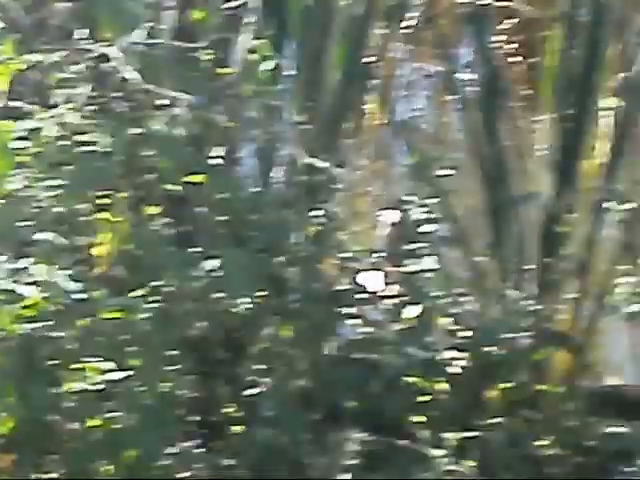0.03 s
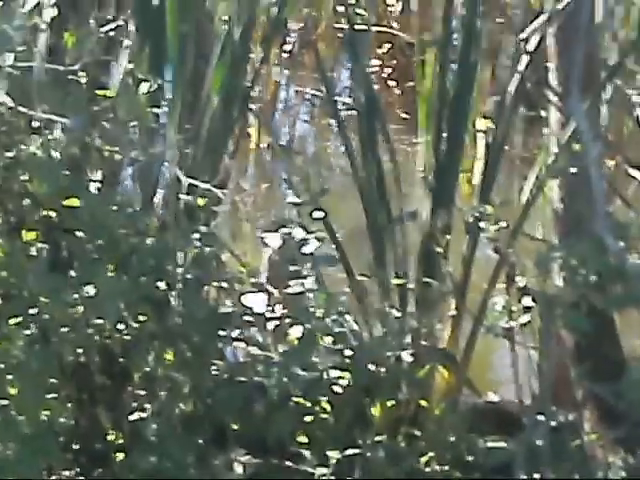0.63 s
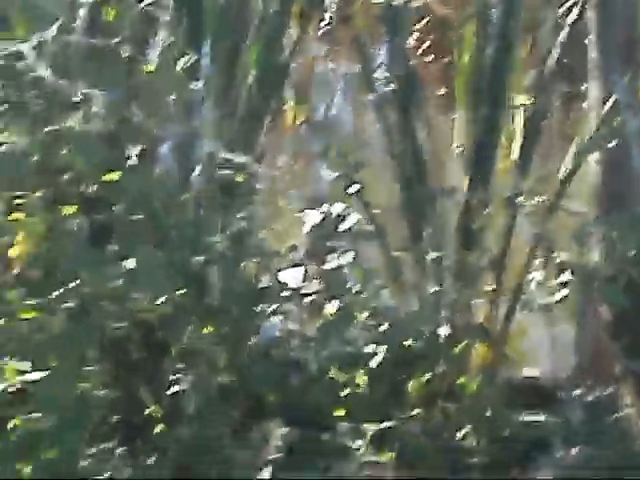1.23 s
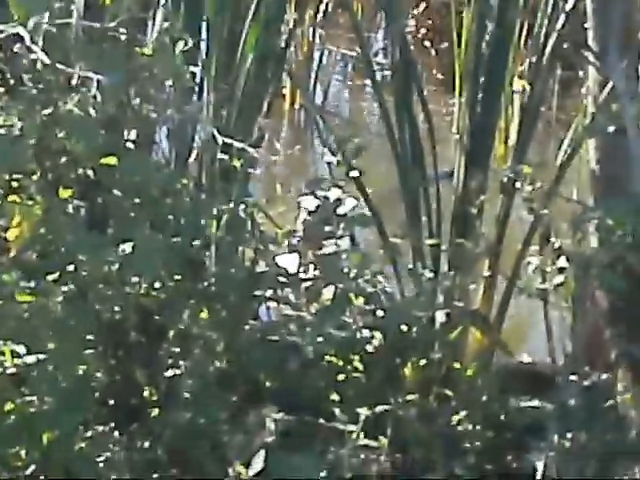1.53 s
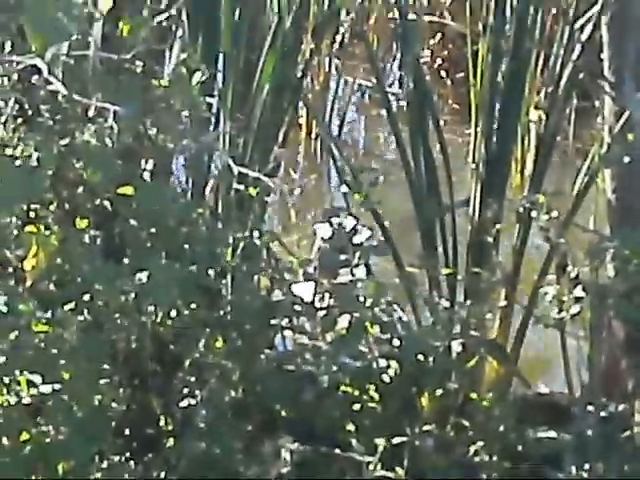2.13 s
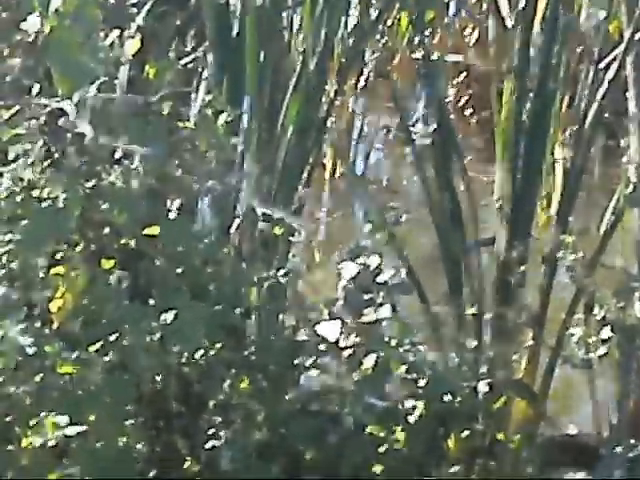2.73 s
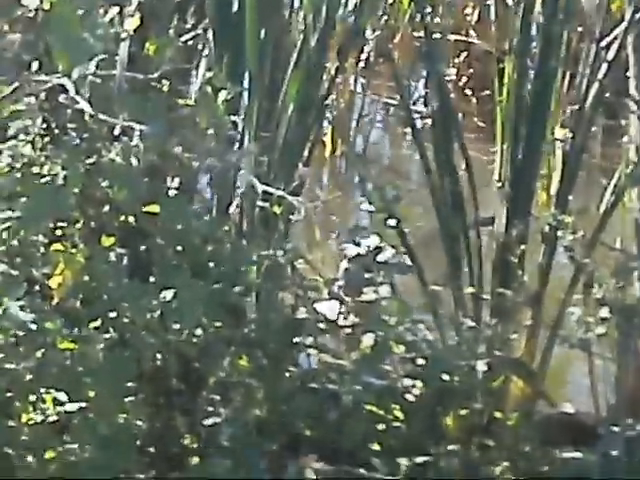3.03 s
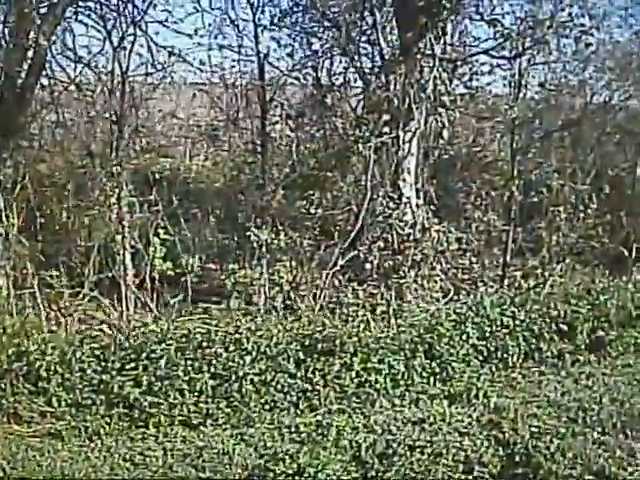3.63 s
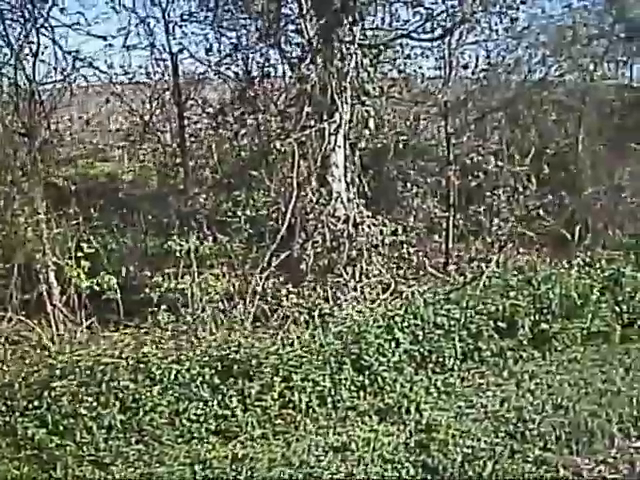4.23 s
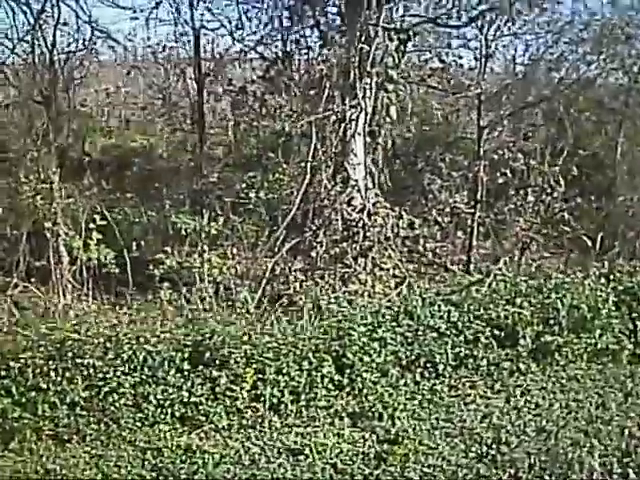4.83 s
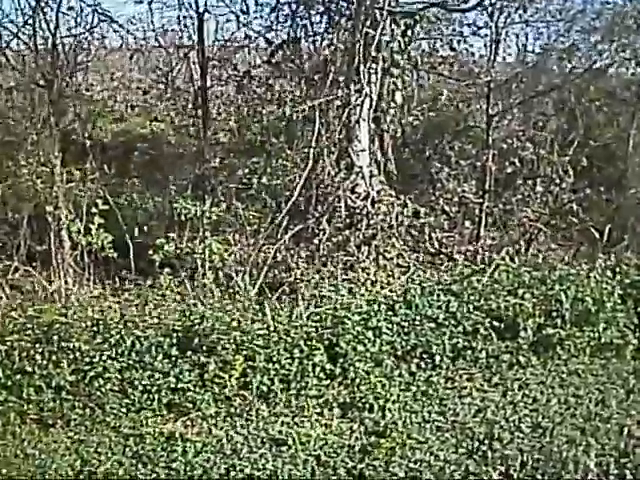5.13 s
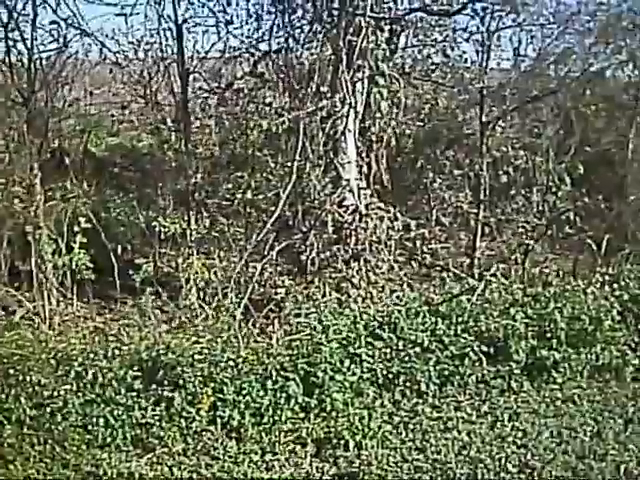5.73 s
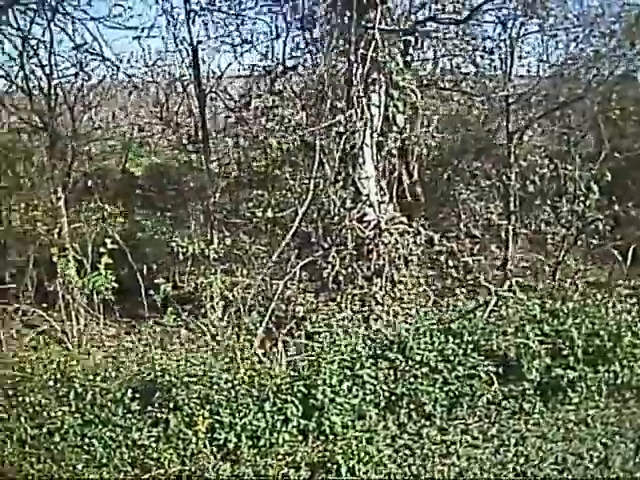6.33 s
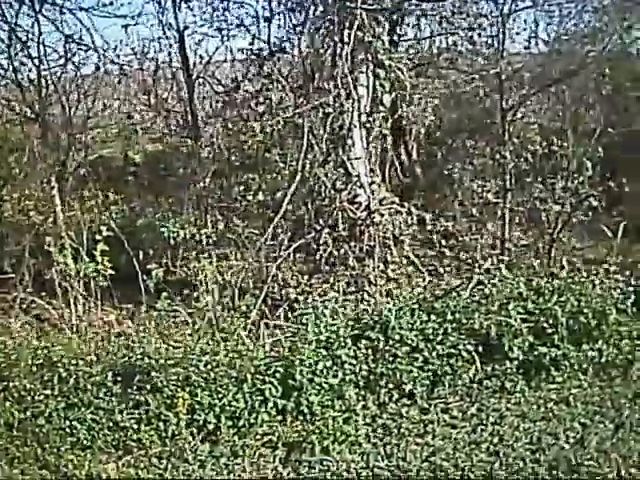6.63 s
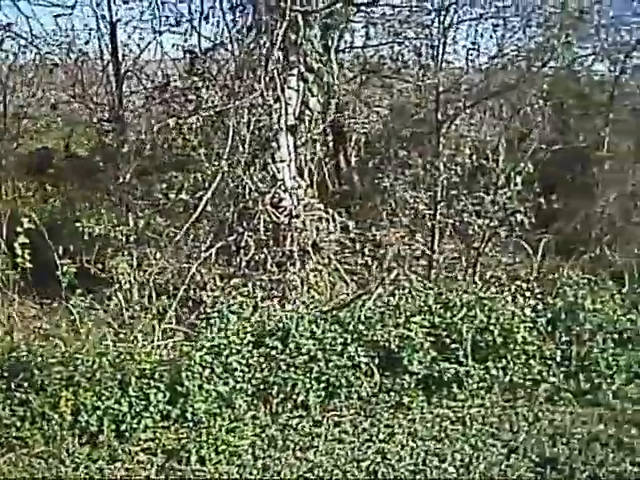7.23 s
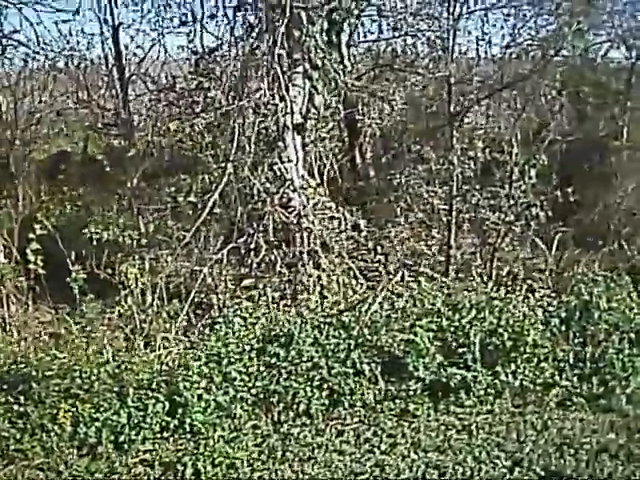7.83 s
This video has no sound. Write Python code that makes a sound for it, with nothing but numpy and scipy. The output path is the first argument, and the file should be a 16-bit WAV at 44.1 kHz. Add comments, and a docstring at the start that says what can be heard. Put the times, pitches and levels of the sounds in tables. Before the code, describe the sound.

Close, irregular rustling of plants with a hollow handling knock, small twig snaps and distant birds over a soft outdoor hush.

```python
"""Leaves and stems rustle, crunch and snap right at the microphone, swept aside beside a reedy pond.
A hand bumps the camera and rings its hollow case; thin squeaks, a stem's creak and soft steps are close.
Geese yelp far off, a nearer bird gives two harsh chacks, and a soft outdoor hush lies under everything.
The camera's one microphone feeds a coarse eight-bit converter that adds grit and passes little
above 5 kHz."""
import sys
import numpy as np
from scipy import signal
from scipy.fft import rfft, irfft
from scipy.io import wavfile

SR = 44100
rng = np.random.default_rng(int(sys.argv[2]) if len(sys.argv) > 2 else 0)


def output_pcm(signal):
    """Save a mono or channel-first signal as 16-bit PCM at the path in sys.argv[1].

    Samples are clipped to [-1, 1] before scaling.
    """
    pcm = np.clip(np.atleast_2d(signal).T, -1, 1) * 32767
    wavfile.write(sys.argv[1], SR, np.round(pcm).astype(np.int16))


N = 348390
TIME = np.arange(N) / SR

# Open air over the pond. Each row: time in seconds, distant hush in dB, leaf hiss in dB.
AIR_LEVELS = [(0, -54.5, -60), (1.3, -56.5, -60), (1.9, -54.5, -56.5), (2.5, -56, -58.5),
              (3.05, -52, -58.5), (3.35, -59.5, -61), (3.6, -57.5, -57.5), (4.3, -55, -57),
              (6.7, -56.5, -58.5), (7.45, -58, -55), (7.7, -57.5, -66), (7.9, -57, -58)]
# Spectra of the hush, the leaf hiss and the rumble. Each row: frequency in Hz, relative density in dB.
HUSH_SPECTRUM = [(200, -7.5), (260, -7), (350, 0), (500, -1), (750, 0), (1000, -0.5), (1300, -4.5),
                 (1750, -8), (2400, -10)]
HISS_SPECTRUM = [(1700, -4.5), (2300, -2.5), (3150, 2), (3600, -1), (4100, -5), (5200, -4)]
RUMBLE_SPECTRUM = [(25, -9), (40, -2), (60, -1), (85, -1), (120, -1), (165, -4), (230, -10.5), (300, -15)]
# Thin squeaks. Each row: time in seconds, pitch in Hz, level in dB.
THIN_SQUEAKS = [(0.014, 3116, -47), (0.222, 3230, -43), (0.37, 3400, -48), (0.452, 2950, -41)]
# Sweeps through the plants at the microphone. Each row: start, attack, hold and time to fall 20 dB,
# all in seconds, then crisp leaf level in dB, duller stem level in dB.
FOLIAGE_SWEEPS = [(0.15, 0.11, 0.091, 0.22, -50.5, -52), (0.378, .045, .09, 0.01, -38, -42.5),
                  (0.532, 0.026, 0.081, 0.08, -57, -52.5), (2.888, 0.034, 0.014, 0.35, -57, -49.5),
                  (3.57, .04, 0.13, 0.22, -47.5, -48.5), (4.387, 0.068, .14, .2, -47, -53),
                  (5.097, 0.083, .12, .33, -41.5, -47), (6.131, 0.051, .13, 0.44, -44, -51),
                  (6.895, .065, 0.18, .24, -37, -42.5)]
# Spectra of crackling leaves and stems. Each row: frequency in Hz, relative density in dB.
LEAF_SPECTRUM = [(1700, -8.5), (2400, -6), (2950, 2), (3280, 1.5), (3750, -2), (4200, -2.5), (4750, -0.5),
                 (5300, -0.5)]
STEM_SPECTRUM = [(130, -35.5), (220, -8.5), (238, -7.5), (352, -13.5), (426, -5.5), (470, -7.5), (723, -4),
                 (874, -3), (1050, -1), (1810, -7.5), (2400, -8), (3120, -26), (5280, -120)]
# Dry leaves crushed close by. Each row: time in seconds, level in dB, half-length in seconds.
LEAF_CRUNCHES = [(0.228, -47, .012), (0.283, -42.5, .008), (0.428, -38.5, .008), (0.505, -32, .012),
                 (2.097, -48.5, 0.0079), (3.599, -43.5, .01), (3.724, -38.5, 0.0045), (4.081, -52, 0.017),
                 (4.426, -38, .009), (4.519, -38.5, 0.0075), (4.614, -45.5, .008), (4.967, -41, .011),
                 (5.188, -38, .012), (5.312, -40.5, .006), (5.341, -41.5, .007), (6.194, -42.5, .014),
                 (6.478, -45.5, .022), (7.056, -30.5, .018)]
# Geese far off. Each row: time in seconds, top pitch in Hz, level in dB,
# gain of the harmonics above the second in dB.
GOOSE_YELPS = [(0.181, 591.5, -49.5, -4.5), (0.335, 433, -47, -7.5), (0.81, 624, -50.5, 0.5),
               (1.055, 560, -46, -10), (1.266, 540, -52.5, -4.5), (1.362, 621.8, -54, 0.5),
               (1.469, 436.4, -50.5, -17), (1.618, 561.4, -50.5, -8), (1.711, 482.7, -47, -10),
               (1.849, 561, -48, -6), (1.971, 535, -49, -8), (2.09, 560, -51.5, -4.5),
               (2.136, 645.6, -46, -12.5), (2.345, 603, -53.5, -18), (7.757, 471, -60.5, 4.5)]
# A goose's voice. Each row: harmonic number, relative level in dB.
GOOSE_HARMONICS = [(2, -1), (3, -3), (4, 1.5), (5, -21)]
# A hand meeting the camera. Each row: time in seconds, strength in dB.
HAND_BUMPS = [(0.4876, -24), (0.4936, -19.3), (0.5048, -8.4), (0.50705, -16.5), (0.51048, -13),
              (0.51504, -15.6), (0.51785, -10.3)]
# Modes of the case around the microphone. Each row: frequency in Hz, gain in dB, 60 dB decay in seconds.
CASE_MODES = [(328, -11, .05), (430, -16.2, .039), (582, -8.5, .045), (754, -13.1, .034), (846, -1.5, .033),
              (944, -9.8, .02), (1254, -9, .027), (1398, -23.8, .038), (1856, -18.6, .025),
              (3550, -24.5, .011)]
# Twigs breaking close by. Each row: time in seconds, strength in dB, pitch in Hz, 60 dB decay in seconds.
TWIG_SNAPS = [(2.4944, -29, 3510, 0.0045), (2.4963, -29, 2070, .005), (3.608, -26, 1980, 0.0043),
              (3.7778, -28, 706, 0.011), (5.302, -21.5, 3020, .0088), (6.138, -29.5, 2024, .011),
              (6.2453, -22.5, 1290, .003)]
# Quick slips of a dry stem. Each row: time in seconds, level in dB.
STEM_SLIPS = [(3.182, -30.5), (3.1868, -24), (3.1943, -31.5), (3.202, -35)]
# The nearer bird. Each row: time in seconds, mid-call pitch in Hz, level in dB, half-length in seconds.
BIRD_CHACKS = [(5.6465, 488, -28.7, 0.011), (6.041, 447, -37, .012)]
# That bird's voice. Each row: harmonic number, relative level in dB.
CHACK_HARMONICS = [(2, -19), (3, -7), (4, -17.5), (5, -6.5), (6, -1.5), (7, -8.5), (8, -8), (10, -4.5)]
# Steps on soft ground. Each row: time in seconds, level in dB, half-length in seconds.
FOOTFALLS = [(6.192, -43, 0.013), (6.54, -35.5, 0.005), (7.035, -47, 0.051), (7.319, -45, 0.014)]
# The smoothing filter after the converter. Each row: frequency in Hz, gain in dB.
SMOOTHING_RESPONSE = [(0, -0.5), (2400, 0), (3300, 1), (4000, -4.5), (4550, -7.5), (5000, -14), (5450, -20),
                      (5800, -39.5), (6250, -52), (6500, -71)]
# Very faint, steady high tones. Each row: frequency in Hz, level in dB.
HIGH_TONES = [(8269, -99), (9647, -101), (11025, -90)]


def from_db(db):
    """Decibels to gain."""
    return 10 ** (np.asarray(db) / 20)


def unit_rms(x):
    """Scale to unit power."""
    return x / np.sqrt(np.mean(x ** 2) + 1e-20)


def swell(s, half_length):
    """A bell-shaped rise and fall around time s."""
    return np.exp(-.5 * np.minimum(((TIME - s) / half_length) ** 2, 100))


def stroke(start, attack, hold, release):
    """A push builds up, holds, then the plants settle by 20 dB per release time."""
    rise = np.clip((TIME - start) / attack, 0, 1)
    settling = np.maximum(TIME - start - attack - hold, 0)
    return rise * from_db(-20 * np.minimum(settling / release, 10))


def drift(rate):
    """A smooth random wander with spread 1, changing about rate times a second."""
    hz = np.arange(N // 2 + 1) * SR / N
    return unit_rms(irfft(rfft(rng.standard_normal(N)) / (1 + (hz / rate) ** 4), N))


def colour(x, spectrum):
    """Give x a spectrum that falls away beyond its ends, at unit power."""
    hz = np.maximum(np.arange(N // 2 + 1) * SR / N, 1)
    points, db = np.transpose(spectrum)
    skirts = np.minimum(1, np.minimum(hz / points[0], points[-1] / hz)) ** 4
    gain = from_db(np.interp(np.log(hz), np.log(points), db))
    return unit_rms(irfft(rfft(x) * skirts * gain, N))


def noise(spectrum):
    """Steady noise, coloured by points of frequency in Hz and relative density in dB."""
    return colour(rng.standard_normal(N), spectrum)


def filtered(x, order, hz, kind):
    """A low, high or band pass with a flat passband."""
    return signal.sosfilt(signal.butter(order, hz, kind, fs=SR, output="sos"), x + 1e-18)


def ring(clicks, hz, t60):
    """A unit click rings a sine of height 1 that falls 60 dB in t60 seconds."""
    radius, angle = from_db(-60 / (t60 * SR)), 2 * np.pi * hz / SR
    return signal.lfilter([0, np.sin(angle)], [1, -2 * radius * np.cos(angle), radius ** 2], clicks + 1e-18)


def click(s, db):
    """One sharp contact."""
    return from_db(db) * (np.arange(N) == round(s * SR))


def grains(per_s, spread_db):
    """Countless tiny fractures: most are faint, a few stand out."""
    sizes = from_db(spread_db * np.minimum(rng.exponential(1, N), 5))
    return sizes * rng.choice([-1, 1], N) * (rng.random(N) < per_s / SR)


def air(flutter_db=1.95, rumble_db=-56, sway_db=.76):
    """The bed of the place: distant hush and faint leaf hiss flutter over a slowly swaying rumble."""
    times, hush_db, hiss_db = np.transpose(AIR_LEVELS)
    sway = sway_db * drift(2.2)
    flutter = flutter_db * drift(40)
    hush = from_db(np.interp(TIME, times, hush_db) + flutter) * noise(HUSH_SPECTRUM)
    hiss = from_db(np.interp(TIME, times, hiss_db) + flutter) * noise(HISS_SPECTRUM)
    rumble = from_db(rumble_db + sway) * noise(RUMBLE_SPECTRUM)
    return hush + hiss + rumble


def squeaks(overtone=1.52, overtone_db=-4, waver=.012, sag_hz_per_s=1500, half_length_s=.014):
    """Brief, thin high notes that waver and sag in pitch, each with one overtone."""
    out, unsteady = np.zeros(N), 1 + waver * drift(200)
    for s, hz, db in THIN_SQUEAKS:
        pitch = (hz - sag_hz_per_s * (TIME - s)) * unsteady
        phase = 2 * np.pi * np.cumsum(pitch) / SR
        note = np.sin(phase) + from_db(overtone_db) * np.sin(overtone * phase)
        out += from_db(db) * swell(s, half_length_s) * note
    return out


def foliage(clump_db=1.27, catch_db=1.0, crunch_stem_db=-8.5):
    """At the microphone, swept or crushed leaves and stems crackle in clumps, catching and letting go."""
    leaf_power, stem_power = np.zeros(N), np.zeros(N)
    for start, attack, hold, release, leaf_db, stem_db in FOLIAGE_SWEEPS:
        push = stroke(start, attack, hold, release)
        leaf_power += (push * from_db(leaf_db)) ** 2
        stem_power += (push * from_db(stem_db)) ** 2
    for s, db, half_length in LEAF_CRUNCHES:
        crush = from_db(db) * swell(s, half_length)
        leaf_power += crush ** 2
        stem_power += (crush * from_db(crunch_stem_db)) ** 2
    leaves = np.sqrt(leaf_power) * colour(grains(per_s=9000, spread_db=4.2), LEAF_SPECTRUM)
    stems = np.sqrt(stem_power) * colour(grains(per_s=6000, spread_db=.5), STEM_SPECTRUM)
    return (leaves + stems) * from_db(clump_db * drift(87) + catch_db * drift(18))


def geese(arch=.026, waver=.026, half_length_s=.018):
    """Far off, short yelps arch up and down in pitch; the second harmonic carries farthest."""
    out, unsteady = np.zeros(N), 1 + waver * drift(120)
    for s, hz, db, upper_db in GOOSE_YELPS:
        calling = np.abs(TIME - s) < 4 * half_length_s
        along = (TIME[calling] - s) / half_length_s
        pitch = hz * unsteady[calling] * np.exp(-arch * along ** 2)
        phase = 2 * np.pi * np.cumsum(pitch) / SR
        voice = sum(from_db(level + upper_db * (k > 2)) * np.sin(k * phase)
                    for k, level in GOOSE_HARMONICS)
        out[calling] += from_db(db) * np.exp(-.5 * along ** 2) * voice
    return out


def handling(softness_hz=2000, first_touch_hz=519, full_touch_hz=335, landed_s=.513):
    """A stutter of soft contacts rings the hollow camera case; it deepens as more of the hand lands."""
    contacts = np.zeros(N)
    for s, db in HAND_BUMPS:
        lowest_hz = first_touch_hz if s < landed_s else full_touch_hz
        contacts += filtered(click(s, db), 4, lowest_hz, "high")
    softened = filtered(contacts, 2, softness_hz, "low")
    return sum(from_db(db) * ring(softened, hz, t60) for hz, db, t60 in CASE_MODES)


def twigs(overtone=2.28, overtone_db=-13):
    """Close by, each break rings briefly in two bending modes and radiates little below them."""
    out = np.zeros(N)
    for s, db, hz, t60 in TWIG_SNAPS:
        crack = filtered(click(s, db), 2, hz / 2, "high")
        out += ring(crack, hz, t60) - from_db(overtone_db) * ring(crack, hz * overtone, t60 / 2)
    return out


def creak(hz=2806, overtone=1.74, overtone_db=-7, rough=.085, scrape_db=-12, half_length_s=.0015):
    """Each slip scrapes a nearby dry stem and sets it singing roughly for a moment."""
    phase = 2 * np.pi * hz * np.cumsum(1 + rough * drift(900)) / SR
    note = np.sin(phase) + from_db(overtone_db) * np.sin(overtone * phase)
    scrape = from_db(scrape_db) * noise(LEAF_SPECTRUM)
    slips = sum(from_db(db) * swell(s, half_length_s) for s, db in STEM_SLIPS)
    return (note + scrape) * slips


def chacks(fall=.045, rough=.028, rasp_db=-5.5):
    """A bird nearer than the geese: each call is a rough note that slides down in rasping noise."""
    out, unsteady = np.zeros(N), 1 + rough * drift(500)
    rasp = noise([(600, -13.5), (1300, -4), (1900, -9), (2500, 0), (3400, -5), (4500, -3), (5400, -1)])
    for s, hz, db, half_length in BIRD_CHACKS:
        along = np.clip((TIME - s) / half_length, -4, 4)
        pitch = hz * unsteady * np.exp(-fall * along)
        phase = 2 * np.pi * np.cumsum(pitch) / SR
        voice = sum(from_db(level) * np.sin(k * phase) for k, level in CHACK_HARMONICS)
        out += from_db(db) * swell(s, half_length) * (voice + from_db(rasp_db) * rasp)
    return out


def footfalls():
    """Near the microphone, weight lands on soft ground with a dull puff."""
    ground = noise([(35, -10.5), (70, -3), (160, -4.5), (240, -16.5), (400, -25.5)])
    return ground * sum(from_db(db) * swell(s, half_length) for s, db, half_length in FOOTFALLS)


def woodland(x, t60=.45):
    """Trunks and banks around the pond scatter a thin tail."""
    scatter = rng.standard_normal(SR) * from_db(-60 * TIME[:SR] / t60)
    return signal.fftconvolve(x, scatter / np.linalg.norm(scatter))[:N]


def converter(x, step=1 / 128, offset=-.01):
    """Eight bits at a quarter of the rate: quiet sound toggles between two steps and turns gritty."""
    narrow = signal.resample_poly(x, 1, 4)
    pulses = np.zeros(N)
    pulses[::4] = 4 * step * np.round((narrow + offset) / step)   # the 4 makes up for the empty samples
    hz = np.arange(N // 2 + 1) * SR / N
    smoothing = from_db(np.interp(hz, *np.transpose(SMOOTHING_RESPONSE)))
    return irfft(rfft(pulses) * smoothing, N)


def scene():
    """Near and far sources reach one microphone on the bank, heard in both channels."""
    leaves, wood = foliage(), twigs() + creak()
    far_birds, near_bird = geese(), chacks()
    tail = woodland(from_db(-8) * near_bird + from_db(-12) * far_birds
                    + from_db(-13.5) * wood + from_db(-23.5) * leaves)
    mono = air() + leaves + wood + handling() + squeaks() + footfalls() + far_birds + near_bird + tail
    return np.array([mono, mono])


def record(dry, hiss_db=-94, width_db=-20, cutoff_hz=11300):
    """Converter grit, very faint hiss and steady high tones; the treble shimmers between the sides."""
    coarse = converter(dry.mean(axis=0))
    treble = filtered(coarse, 4, [2150, 4100], "band")
    side = from_db(width_db) * treble * drift(150)
    tones = sum(from_db(db) * np.sin(2 * np.pi * hz * TIME) for hz, db in HIGH_TONES)
    hiss = from_db(hiss_db) * noise([(5000, 3), (9800, -2.5), (10700, 7), (11200, 0)])
    mid = coarse + tones + hiss
    top_cut = signal.cheby1(12, .3, cutoff_hz, fs=SR, output="sos")
    return signal.sosfilt(top_cut, [mid + side, mid - side])


dry = scene()
out = record(dry)
output_pcm(out)
```